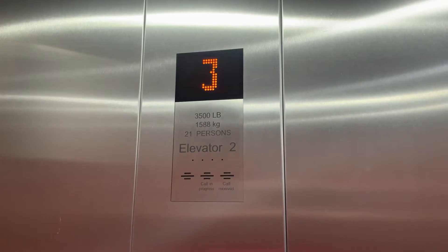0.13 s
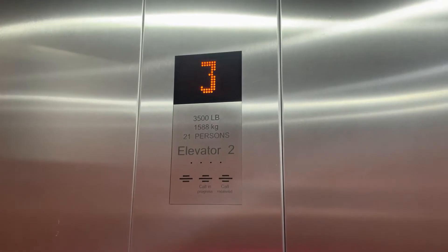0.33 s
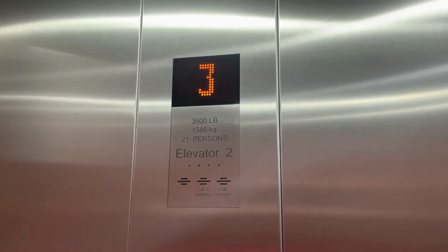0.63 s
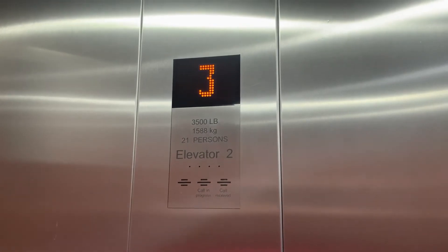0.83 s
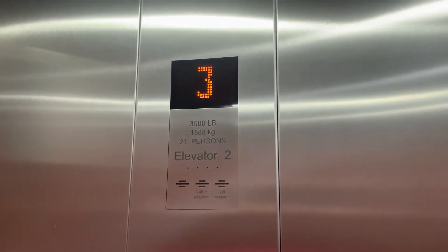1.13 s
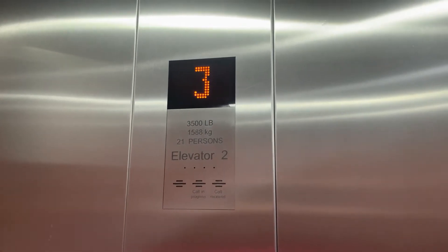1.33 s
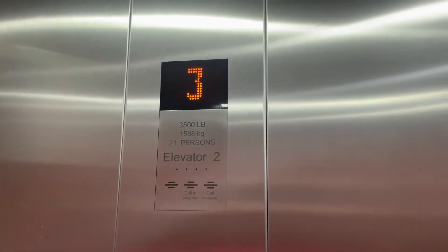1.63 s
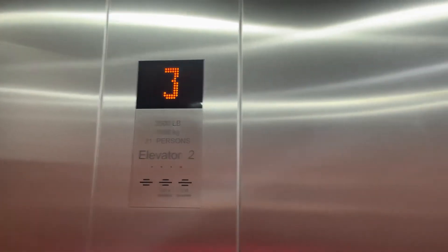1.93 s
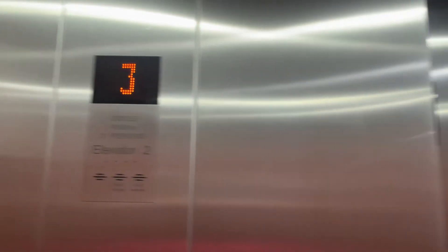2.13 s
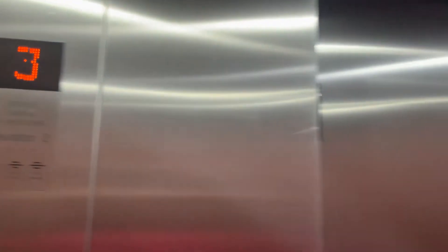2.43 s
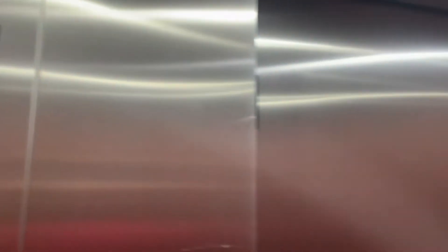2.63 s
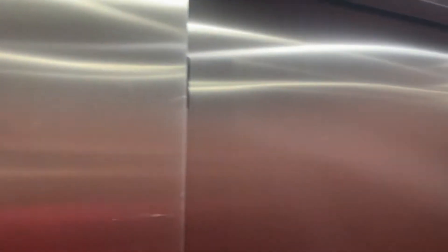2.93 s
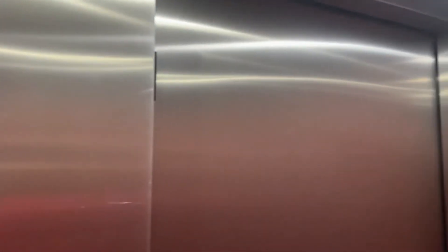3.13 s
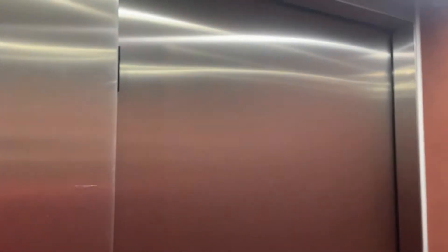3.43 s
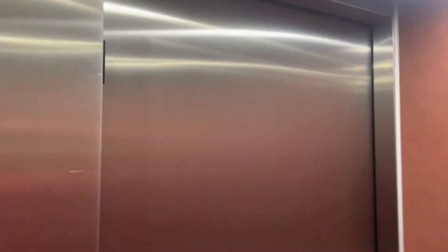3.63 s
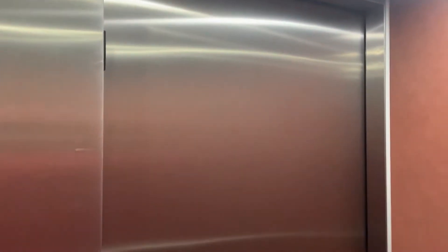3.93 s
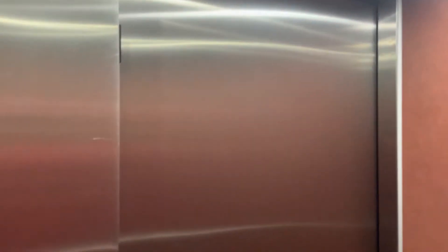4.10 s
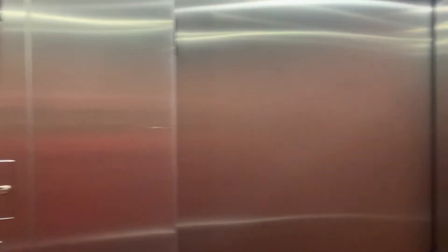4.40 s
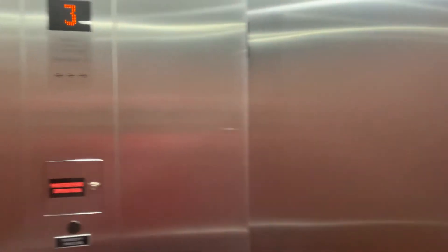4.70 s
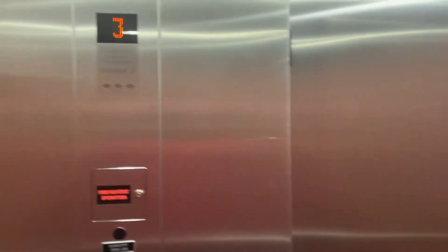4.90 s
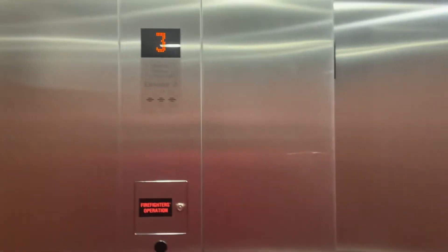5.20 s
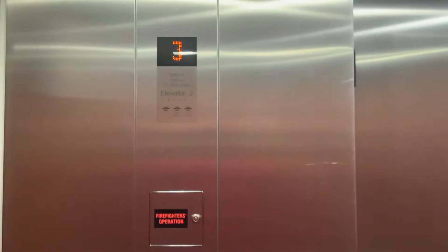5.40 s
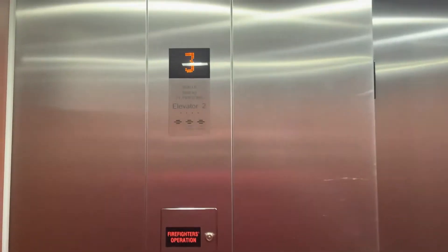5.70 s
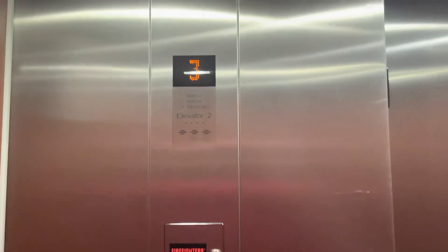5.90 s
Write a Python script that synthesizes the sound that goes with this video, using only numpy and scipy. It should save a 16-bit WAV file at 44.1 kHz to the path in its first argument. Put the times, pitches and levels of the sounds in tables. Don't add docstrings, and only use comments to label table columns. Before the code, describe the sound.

Inside a small steel lift cabin, a fan holds a steady low buzzing hum near 250 Hz throughout, over deep rumble and soft, breathy vent air with faint high hiss. Two or three dull bumps fall within the first 0.2 seconds, followed by a light cloth brush at 0.3 and a small pop at 0.45. A thin motor whine wavers and beats, clearest in the first three seconds, then fading. From about 1.9 the hand-held stereo microphone turns; the hum grows fuller, strongest around 3.3, and overtones swell and fade. A sharp tick at 2.75 leads to a solid metallic knock at 2.85, with a short boomy ring, a rumble surge and rustling. Scuffs and a bright flick come at 4.2-4.3, a weak pop at 4.85 and a louder hollow pop at 5.25. The hum, somewhat softer, continues until an abrupt end near 6 seconds.

```python
import sys
import numpy as np
from scipy import signal
from scipy.fft import rfft, irfft
from scipy.io import wavfile
from scipy.ndimage import uniform_filter1d, map_coordinates

SR = 44100
rng = np.random.default_rng(int(sys.argv[2]) if len(sys.argv) > 2 else 0)


def level_to_linear(level):
    exponent = np.asarray(level, float) / 20
    return 10 ** exponent


def digitize_waveform(pressure):
    field = np.atleast_2d(pressure).T
    bounded = np.clip(field, -1, 1)
    quanta = np.round(bounded * 32767).astype(np.int16)
    wavfile.write(sys.argv[1], SR, quanta)


N = 266849
T = np.arange(N) / SR

# (time [s], heading [-])
TURN = [
    (0, 0.0054),
    (1.85, 0.17),
    (2.4, 0.97),
    (3.9, 1.21),
    (4.9, 2),
    (6.05, 2.06),
]
# (centre [Hz], width [Hz], level facing panel [dB], level turned away [dB])
AIR_MODES = [(197.2, 8.6, 7.5, 7.5), (225, 20, -9.5, 9.5), (246.6, 20, 7.5, 5), (272.8, 15.6, 8.5, 9.5),
             (333, 70, 0, -9), (359, 16, -5, 4), (429, 33, 0.5, -4.5), (457, 61, 4, -1.5),
             (515.6, 22, 0, 4.5), (566, 20, -4.5, 3), (638.5, 27, 1.5, -5.5), (734, 46, -2.5, 1),
             (894, 4.4, 0, 1), (974, 54, 0.5, 2), (1037, 10, 14, 4), (1062, 12, -3, 14)]


def unit(x):
    return x / np.sqrt(np.mean(x ** 2) + 1e-20)


def along(points, hz):
    f, v = np.transpose(points)
    return np.interp(np.log(hz + 1), np.log(f + 1), v)


def curves(rows):
    s, *cols = np.transpose(rows)
    return [np.interp(T, s, c) for c in cols]


def wobble(rate):
    return map_coordinates(rng.standard_normal(int(N * rate / SR) + 4), [T * rate], order=1)


def noise(spectrum, patchy_db=0., tilt=((1, 0),)):
    z = signal.stft(rng.standard_normal(N + 512), nperseg=512)[2]
    field = uniform_filter1d(rng.standard_normal(z.shape), size=6, axis=0)
    field = uniform_filter1d(field, size=14, axis=1)
    x = signal.istft(z * level_to_linear(patchy_db * unit(field)), nperseg=512)[1][:N]
    hz = np.fft.rfftfreq(N, 1 / SR)
    shaped = rfft(x) * level_to_linear(along(spectrum, hz))
    return irfft(shaped * level_to_linear(along(tilt, hz)), N) / np.std(irfft(shaped, N))


def stereo(mid, side):
    return np.array([mid + side, mid - side])


def burst(s, rise, t60):
    out, first = np.zeros(N), int(np.ceil(s * SR))
    t = T[first:first + SR] - s
    out[first:first + SR] = (1 - np.exp(-t / rise)) * level_to_linear(-60 * t / t60)
    return out


def plateau(start, end, db):
    edge_s = .08
    t = T[::64]
    swell = np.tanh((t - start) / edge_s) - np.tanh((t - end) / edge_s)
    return level_to_linear(db) * np.interp(T, t, swell) / 2


def facing(values):
    return np.interp(curves(TURN)[0], range(3), values)


def fading():
    # (time [s], share [0-1])
    hand_motion = [(0, .07), (1.8, .1), (2.3, .2), (4.4, .22), (6.05, .2)]
    stir, = curves(hand_motion)
    reflected = stir * (wobble(2.5) + 1j * wobble(2.5))
    return 20 * np.log10(abs(1 + reflected) + .05)


def fan():
    blade_hz, creep_hz = 252.1, .2
    null_depth = .92
    # (time [s], level [dB], left minus right [dB])
    fundamental = [(0, -37, -4.5), (1.75, -37.5, -2.5), (2.4, -32.5, -0.5), (2.7, -30.5, -1.5),
                   (3.3, -28.5, -.5), (3.7, -30, 1.5), (4.15, -29.5, 1.5), (4.65, -33, -1.5),
                   (5.2, -32, -3.5), (6.05, -34.5, -6)]
    # (multiple [-], level at headings 0, 1, 2 [dB] each)
    overtones = [(2, -42, -56, -52.5), (3, -62, -59.5, -62.5), (4, -72, -70, -69), (5, -80, -72.5, -72.5),
                 (6, -60.5, -66, -68.5), (7, -89, -78.5, -77.5), (8, -72.5, -70.5, -70),
                 (9, -74, -70.5, -78), (10, -90.5, -79.5, -76.5), (11, -81.5, -76, -76.5),
                 (12, -64, -72.5, -73), (13, -83, -78.5, -78), (14, -67.5, -71, -75.5), (15, -87, -86, -78),
                 (16, -75, -77, -80), (17, -69, -70.5, -73.5), (18, -75.5, -82, -79), (19, -94, -83.5, -84),
                 (20, -81.5, -79.5, -81.5), (21, -79.5, -81.5, -77), (22, -91.5, -85.5, -87),
                 (23, -88.5, -96, -95.5), (24, -95, -93.5, -95.5), (25, -85, -92.5, -101),
                 (26, -86, -95, -97.5), (27, -100, -100, -103)]
    # (multiple [-], start [s], end [s], level [dB])
    crests = [(2, 3.66, 4.4, -44), (2, 4.4, 5.4, -51), (2, 5.5, 5.75, -49), (3, 2.31, 2.9, -51.5),
              (3, 3.3, 4.2, -54), (3, 4.5, 5.4, -54), (4, 0.9, 2.2, -62.5), (4, 5.03, 6.2, -53),
              (5, 2.2, 2.6, -69), (5, 2.95, 3.5, -65), (5, 5.35, 5.8, -62), (6, 3.38, 3.62, -64),
              (6, 5.0, 5.8, -66), (8, 2.05, 2.7, -64), (10, 2.2, 2.6, -73), (10, 5.58, 5.82, -71),
              (11, 2.95, 3.4, -68), (11, 4.6, 5.0, -70), (11, 5.4, 6.1, -69), (12, 2.55, 3.6, -68),
              (12, 4.6, 5.0, -67), (13, 2.6, 2.8, -70), (13, 3.2, 3.4, -72), (14, 4.6, 5.1, -72),
              (16, 2.2, 2.6, -70), (16, 4.2, 4.6, -72), (17, 4.02, 4.55, -68), (17, 4.95, 5.3, -67),
              (17, 5.85, 6.1, -67), (18, 4.2, 4.95, -73), (18, 5.2, 6.1, -71), (20, 2.0, 2.5, -73),
              (20, 3.75, 4.15, -75), (21, 5.0, 5.4, -76), (21, 5.6, 5.8, -74)]
    # (multiple [-], start [s], end [s])
    nulls = [(2, 0.2, 0.35), (2, 2.6, 2.8), (2, 3.0, 3.3), (3, 1.7, 2.25), (4, 4.35, 4.8), (6, 2.9, 3.25),
             (6, 3.78, 4.0), (6, 4.4, 4.75), (8, 3.95, 4.6), (11, 3.4, 3.55), (11, 5.2, 5.38),
             (14, 3.2, 3.35), (14, 4.4, 4.58), (16, 3.4, 4.15), (17, 2.4, 2.6), (17, 1.82, 2.0),
             (17, 2.9, 3.22), (17, 3.34, 3.52), (17, 3.85, 4.0), (17, 4.6, 4.9), (17, 5.75, 5.85),
             (18, 2.0, 2.2), (18, 5.0, 5.18)]
    # (frequency [Hz], side minus mid [dB])
    side_levels = [(250, -23), (500, -2.5), (1000, -6), (2000, -7), (4000, -6.5), (7000, 2.5)]
    # (frequency [Hz], phase [rad])
    side_phases = [(250, 1.3), (500, 1.5), (1000, .8), (1500, 2), (4000, 2.3), (7000, 1.7)]

    tone_db, lean_db = curves(fundamental)
    levels = [level_to_linear(tone_db)]
    for k, *heading_db in overtones:
        levels.append(level_to_linear(facing(heading_db) + 0.14 * k + fading()))
    for k, *crest in crests:
        levels[k - 1] = np.hypot(levels[k - 1], plateau(*crest))
    for k, *span in nulls:
        levels[k - 1] = levels[k - 1] * (1 - null_depth * plateau(*span, 0))

    speed_hz = blade_hz + creep_hz * (curves(TURN)[0] - .5)
    cycle = 2 * np.pi * np.cumsum(speed_hz) / SR + 0.011 * wobble(4.6)
    mid = np.zeros(N)
    lean = np.tanh(lean_db * np.log(10) / 40)
    side = np.sqrt(2) * levels[0] * lean * np.sin(cycle)
    for k, level in enumerate(levels, 1):
        gain = np.sqrt(2) * level * level_to_linear(1.3 * wobble(9))
        phase = k * cycle + (k > 1) * rng.uniform(0, 2 * np.pi)
        mid += gain * np.sin(phase)
        side_gain = gain * level_to_linear(along(side_levels, k * blade_hz) + 3.5 * wobble(1.2))
        side += side_gain * np.sin(phase + 0.7 * wobble(.6) + along(side_phases, k * blade_hz))
    return stereo(mid, side)


def swelling():
    roundness, gap_db = .7, -17
    # (time of gap [s], peak level of the swell after it [dB])
    beats = [(-.1, -49.5), (.18, -52.5), (.44, -53.5), (.79, -72), (.86, -54), (.99, -54.5), (1.16, -48.5),
             (1.36, -52), (1.5, -60), (1.57, -48.5), (1.75, -55), (1.94, -57.5), (2.04, -53.5), (2.2, -53),
             (2.34, -53.5), (2.43, -56.5), (2.53, -66), (2.64, -55), (2.86, -60), (2.97, -56), (3.08, -55),
             (3.19, -53), (3.28, -63), (3.44, -61.5), (3.64, -60), (3.98, -66.5), (4.24, -68.5),
             (4.41, -66), (4.64, -66), (4.87, -64.5), (5.04, -64.5), (5.25, -78.5), (6.2, -79)]
    gaps, peaks_db = np.transpose(beats)
    place = np.interp(T, gaps, np.arange(len(gaps)))
    arch = np.abs(np.sin(np.pi * place)) ** roundness
    return level_to_linear(peaks_db[place.astype(int)]) * arch + level_to_linear(np.interp(T, gaps, peaks_db) + gap_db)


def motors():
    # (time [s], fifth multiple [Hz])
    speed = [(0, 1946.5), (.6, 1954), (1.2, 1960), (1.8, 1952), (2.35, 1946.5), (3.05, 1958), (3.75, 1940),
             (4.3, 1941), (4.65, 1932), (5.3, 1940), (6.05, 1934)]
    # (time [s], frequency [Hz])
    whistle_pitch = [(0, 4272), (.3, 4281), (.55, 4297), (.9, 4318), (1.15, 4330), (1.35, 4318),
                     (1.65, 4298), (1.95, 4280), (2.3, 4268), (2.6, 4283), (3.07, 4322), (3.25, 4303),
                     (3.45, 4285), (3.7, 4258), (3.85, 4246), (4.1, 4256), (4.5, 4250), (6.05, 4240)]
    whistle_db = (-71.5, -71.5, -95)
    # (start [s], end [s], level [dB])
    whistle_crests = [(.4, .7, -71), (.75, 1.6, -71.5), (1.86, 1.97, -58.5), (2.949, 3.17, -65),
                      (3.368, 3.484, -56), (3.66, 3.78, -71), (4.1, 4.45, -77)]
    # (start [s], end [s], level [dB])
    first_crests = [(0.81, 1.3, -49), (2.6, 3.15, -44.5), (5.256, 5.55, -45.5)]
    # (start [s], end [s], level over the mean [dB])
    hum_swells = [(.05, .3, -2), (2.5, 2.95, -2), (3.33, 3.8, -1), (4.1, 4.62, 3), (4.8, 5.25, 2),
                  (5.55, 5.75, -3.5)]
    lamp_turn_db = (-4, -0.5, -7)
    lamp_hz, lamp_db = 10990, -86
    line_hz, line_db = 4337, -83
    hum_hz, hum_db, hum_rest_db = 47.3, -41, -9

    turns = np.cumsum(curves(speed)[0]) / SR / 5
    whistle = np.cumsum(curves(whistle_pitch)[0]) / SR
    first = level_to_linear(-57) + sum(plateau(*crest) for crest in first_crests)
    thin = level_to_linear(facing(whistle_db)) + sum(plateau(*crest) for crest in whistle_crests)
    half_speed = plateau(2.97, 4.3, -45)
    partials = [
        (turns, first, .25, .3),
        (5 * turns, swelling(), .3, .3),
        (whistle, thin, .55, -.5),
        (turns / 2, half_speed, .3, .1)]
    out = np.zeros((2, N))
    for cycles, level, depth, side_share in partials:
        flutter = [1 + depth * (wobble(24) + 1j * wobble(24)) for port in range(2)]
        mid, side = (np.sqrt(2) * np.real(f * np.exp(2j * np.pi * cycles)) for f in flutter)
        out += level * stereo(mid, side_share * side)

    lamp = np.real((wobble(25) + 1j * wobble(25)) * np.exp(2j * np.pi * lamp_hz * T))
    out += level_to_linear(lamp_db + facing(lamp_turn_db)) * lamp
    out += np.sqrt(2) * level_to_linear(line_db) * np.sin(2 * np.pi * line_hz * T)
    swell = level_to_linear(hum_rest_db) + sum(plateau(*crest) for crest in hum_swells)
    return out + np.sqrt(2) * level_to_linear(hum_db) * swell * np.sin(2 * np.pi * hum_hz * T)


def resonant(x, levels_db):
    hz = np.fft.rfftfreq(N, 1 / SR)
    power = 0.3
    for (centre, width, *_), db in zip(AIR_MODES, levels_db):
        power = power + level_to_linear(2 * db) / (1 + (2 * (hz - centre) / width) ** 2) ** 2
    return irfft(rfft(x) * np.sqrt(power), N)


def air():
    # (frequency [Hz], density [dB per Hz])
    rumble_colour = [(15, -48.5), (25, -22), (38, -14), (91, -1.5), (130, -10.5), (168, -13.5),
                     (185, -18.5), (230, -38.5), (400, -120)]
    body_colour = [(100, -61.5), (170, -3), (300, 0.5), (500, -0.5), (650, -4), (800, -14.5), (1000, -19),
                   (1200, -25), (1500, -61), (1900, -120)]
    rush_colour = [(700, -36), (1000, -6.5), (1300, -10.5), (1750, -11.5), (2460, -14.5), (3400, -15.5),
                   (4500, -19.5), (5600, -24.5), (6600, -29), (7300, -36), (7700, -44), (9000, -120)]
    rush_side = [(700, -40), (1000, -19), (1810, -18.5), (2640, -29), (4390, -33.5), (8090, -36),
                 (10000, -44), (10500, -64), (12000, -120)]
    hiss_colour = [(7000, -120), (8700, -39.5), (9100, -5), (9710, -3), (11200, -3), (12200, -6),
                   (12900, -17), (13500, -40), (16000, -120)]
    hiss_side = [(11000, -120), (12200, -41.5), (12700, -9.5), (14500, 3.5), (15600, -6.5), (16100, -40),
                 (18000, -120)]
    # (frequency [Hz], side minus mid [dB])
    low_width = [(40, -19), (110, -13.5), (220, -10), (400, -7), (800, 3)]
    rush_db = (-57.5, -58, -61)
    hiss_db = (-80, -80.5, -84)
    # (start [s], end [s], level [dB])
    surges = [
        (-.1, .25, -33.5),
        (.45, .7, -40),
        (1.2, 1.4, -48),
        (1.75, 2.15, -41),
        (2.938, 3.204, -33),
        (3.346, 3.751, -40),
        (4.35, 4.65, -43),
        (5.55, 5.75, -41),
    ]
    # (start [s], end [s], frequency [Hz], level [dB])
    air_swells = [(.05, .15, 635, -51), (.97, 1.1, 635, -51.5), (1.6, 1.69, 458, -47),
                  (1.9, 2.08, 430.3, -47.5), (2.58, 2.72, 649, -50.5), (3.32, 3.579, 520, -41),
                  (3.45, 3.62, 455, -44), (4.43, 4.58, 565, -50), (4.45, 4.62, 72, -35),
                  (5.3, 5.401, 368, -46), (5.3, 5.7, 565, -52), (5.9, 6.0, 535, -48)]

    shudder = np.hypot(level_to_linear(-38.5), sum(plateau(*surge) for surge in surges))
    rumble = stereo(noise(rumble_colour), noise(rumble_colour, patchy_db=0.5, tilt=low_width))
    rumble = rumble * np.array([[1.07], [0.93]])
    body = stereo(noise(body_colour, patchy_db=1.8), noise(body_colour, patchy_db=1.8, tilt=low_width))
    away = np.clip(curves(TURN)[0], 0, 1) * np.pi / 2
    _, _, panel_db, away_db = np.transpose(AIR_MODES)
    body = np.cos(away) * resonant(body, panel_db) + np.sin(away) * resonant(body[:, ::-1], away_db)
    rush = stereo(noise(rush_colour, patchy_db=1.3), level_to_linear(-2.0) * noise(rush_side, patchy_db=1.3))
    hiss = stereo(noise(hiss_colour, patchy_db=3.0), level_to_linear(-5.5) * noise(hiss_side, patchy_db=-4.5))
    draught_db = 0.49 * wobble(3.5)
    out = shudder * rumble + level_to_linear(-40) * body
    out += level_to_linear(facing(rush_db) + draught_db) * rush
    out += level_to_linear(facing(hiss_db) + 0.9 * draught_db + .7 * wobble(6.4)) * hiss
    for start, end, hz, db in air_swells:
        out += np.sqrt(2) * plateau(start, end, db) * np.sin(2 * np.pi * hz * T)
    return out


def band(centre_hz, octaves=1.1):
    hump = [(-2, -60), (-.5, -3), (0, 0), (.5, -3), (2, -60)]
    return [(centre_hz * 2 ** (octaves * k), db) for k, db in hump]


def handling():
    # (time [s], level [dB], frequency [Hz], t60 [s])
    thumps = [
        (0.031, -21, 88, 0.18),
        (0.174, -18, 78, 0.12),
        (0.2, -21, 104, 0.12),
    ]
    # (time [s], level [dB], rise [s], t60 [s], dullness of lower band [dB])
    rustles = [
        (.06, -77, .02, .2, -4),
        (.29, -66.5, 0.015, .2, -8),
        (2.746, -66, 0.0031, 0.11, -14),
        (2.825, -70.5, 0.0039, 0.13, -2),
        (2.955, -68, 0.017, 0.17, -7.5),
        (3.055, -75, .008, .15, -2),
        (3.29, -73, .01, 0.23, -5.5),
        (3.5, -95, 0.04, 0.51, -8),
        (4.205, -75, .004, 0.17, -9),
        (4.28, -61.5, 0.0034, 0.26, -25),
    ]
    # (time [s], level [dB], frequency [Hz], t60 [s])
    pops = [
        (.45, -41, 836, .06),
        (4.84, -47, 875, 0.073),
        (5.251, -31, 820, 0.036),
    ]
    # (time [s], level [dB], t60 [s], top [Hz])
    ticks = [
        (2.7448, -50, .009, 16000),
        (2.8228, -62, .014, 12300),
        (2.962, -68, .03, 12300),
        (4.2808, -62, .05, 16000),
    ]
    # (time [s], level [dB], t60 [s], centre [Hz])
    scuffs = [
        (3.29, -60, .12, 2500),
        (4.207, -50, .22, 1900),
        (4.282, -56, .3, 3800),
    ]
    # (frequency [Hz], density [dB per Hz])
    cloth_mid = [(7000, -92), (8400, -14.5), (9300, -3.5), (11800, -6.5), (12900, -15), (14200, -23.5),
                 (15500, -14.5), (16300, -41.5), (18000, -120)]
    cloth_side = [(3000, -39.5), (6000, -4.5), (8000, -3.5), (10000, -5.5), (10700, -38), (12200, -32.5),
                  (13000, -9.5), (15500, -8), (16300, -33.5), (18000, -120)]
    cloth_low = [(900, -61), (1900, 1), (3000, 0.5), (5500, -4), (7500, -13.5), (8000, -120)]
    tick_colour = [(5000, -120), (7000, -12), (8500, -4), (10500, 0), (12500, -5), (14000, 1), (15500, 5),
                   (16300, -40), (18000, -120)]

    high, low = np.zeros(N), np.zeros(N)
    for s, db, rise, t60, low_db in rustles:
        envelope = level_to_linear(db) * burst(s, rise, t60)
        high += envelope
        low += level_to_linear(low_db + 21.0) * envelope
    out = high * stereo(noise(cloth_mid, patchy_db=1.5), level_to_linear(3) * noise(cloth_side, patchy_db=1.5))
    out += low * stereo(noise(cloth_low, patchy_db=1.5), level_to_linear(-2.0) * noise(cloth_low, patchy_db=1.5))
    for s, db, t60, top_hz in ticks:
        dull = [(top_hz, 0), (top_hz + 700, -60)]
        scratch = stereo(noise(tick_colour, tilt=dull), noise(tick_colour, tilt=dull))
        out += level_to_linear(db) * burst(s, .0004, t60) * scratch
    for s, db, t60, centre_hz in scuffs:
        drag = stereo(noise(band(centre_hz)), level_to_linear(-2) * noise(band(centre_hz)))
        out += level_to_linear(db) * burst(s, 0.0036, t60) * drag
    for rise, events in [(0.0024, pops), (0.013, thumps)]:
        for s, db, hz, t60 in events:
            out += level_to_linear(db) * burst(s, rise, t60) * np.sin(2 * np.pi * hz * (T - s))
    return out


def knock():
    s, db = 2.846, -32
    panel_db, longest_s = -30, .4
    # (frequency [Hz], density [dB per Hz])
    knock_colour = [(120, -42), (220, -17.5), (400, -14), (736, -8.5), (1000, -12.5), (1300, -20.5),
                    (1700, -16.5), (2600, -27), (4140, -33), (7000, -45.5), (7700, -69), (9000, -120)]
    boom_colour = [(120, -120), (190, -6), (260, 0.5), (380, 2), (520, -3.5), (750, -10.5), (1200, -120)]
    # (frequency [Hz], t60 [s])
    reverberation = [(300, 0.96), (1000, 0.55), (2500, 0.46), (6000, 0.2)]
    # (frequency [Hz], level [dB], t60 [s])
    wall_modes = [(399, -2, 0.28), (720, -4.5, 0.39), (970, -11, 0.41), (1067, -1, 0.073), (1115, -6, 0.17),
                  (1300, -27, 5.0), (1705, -14, 0.58), (1930, -19.5, 0.36), (2299, -15.5, 0.25)]

    pair = np.array([noise(knock_colour), level_to_linear(-0.5) * noise(knock_colour)])
    hz, t, z = signal.stft(pair, SR, nperseg=256)
    decay = level_to_linear(-60 * np.clip(t - s, 0, None) / along(reverberation, hz)[:, None])
    tail = signal.istft(z * decay, SR, nperseg=256)[1][:, :N]
    onset = 1 - np.exp(-np.clip(T - s, 0, None) / .005)
    boom = level_to_linear(3.0) * burst(s, 0.026, 0.86) * np.array([noise(boom_colour), level_to_linear(-9.5) * noise(boom_colour)])
    crack = 1.87 * pair * burst(s, 0.0012, 0.034)
    contact = 0.7 * pair * burst(s - .004, 0.00098, .02)
    ring = np.zeros(N)
    for mode_hz, level, t60 in wall_modes:
        envelope = burst(s, .002, min(t60, longest_s))
        ring += level_to_linear(panel_db + level) * envelope * np.sin(2 * np.pi * mode_hz * (T - s))
    return ring + level_to_linear(db) * stereo(*(boom + tail * onset + crack + contact))


def scene():
    return fan() + motors() + air() + handling() + knock()


def low_pass(x):
    return signal.sosfilt(signal.butter(12, 15900, fs=SR, output="sos"), x)


def record(dry):
    gate = np.clip(np.minimum(T, T[::-1]) / .004, 0, 1)
    return low_pass(dry * gate)


dry = scene()
out = record(dry)
digitize_waveform(out)
```